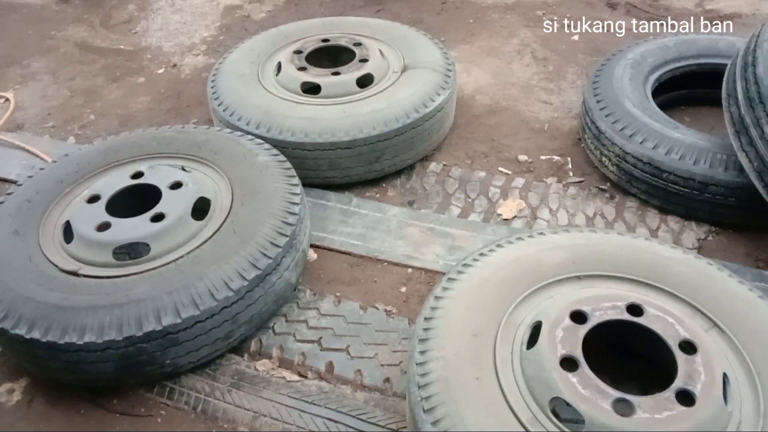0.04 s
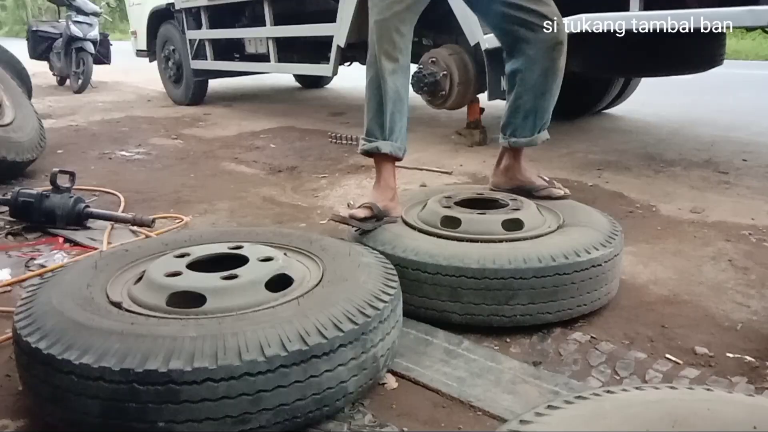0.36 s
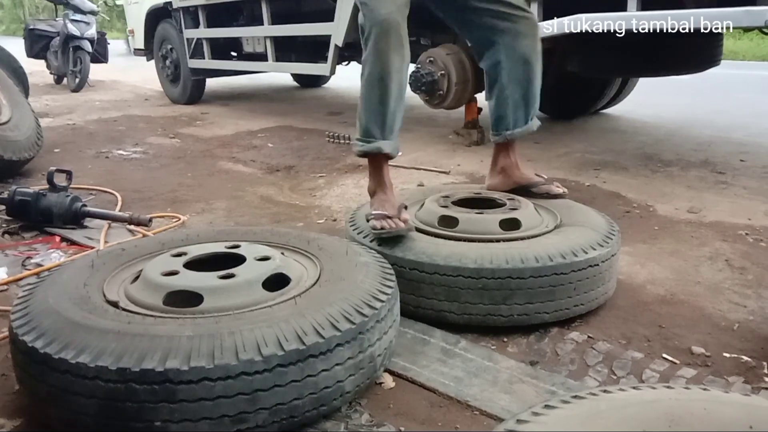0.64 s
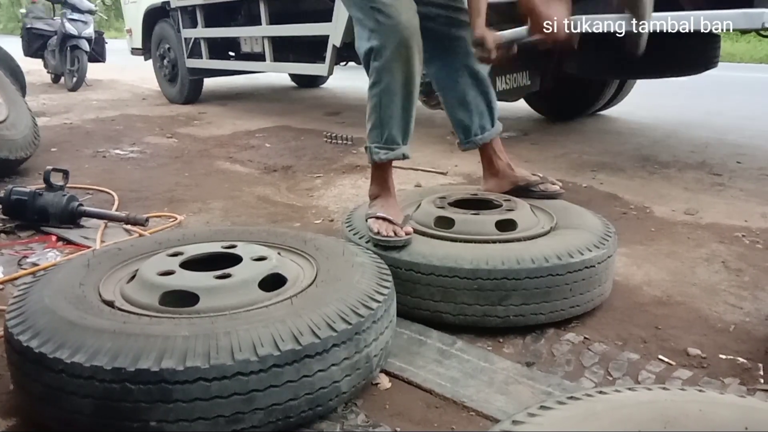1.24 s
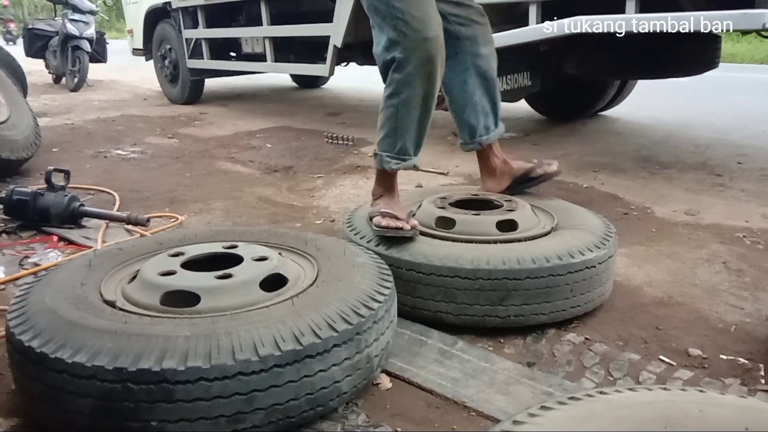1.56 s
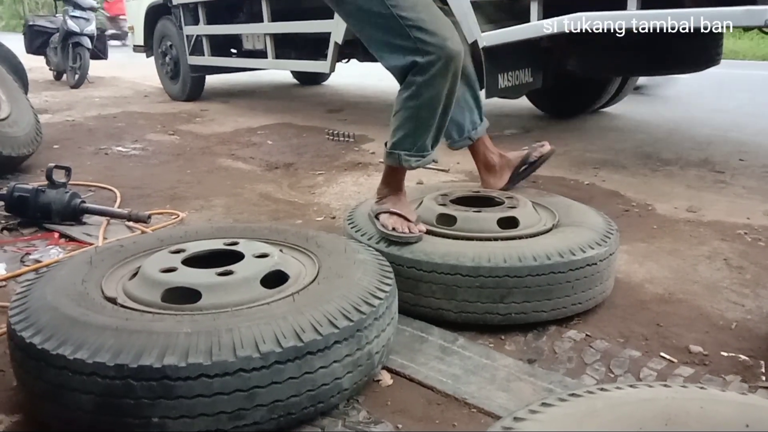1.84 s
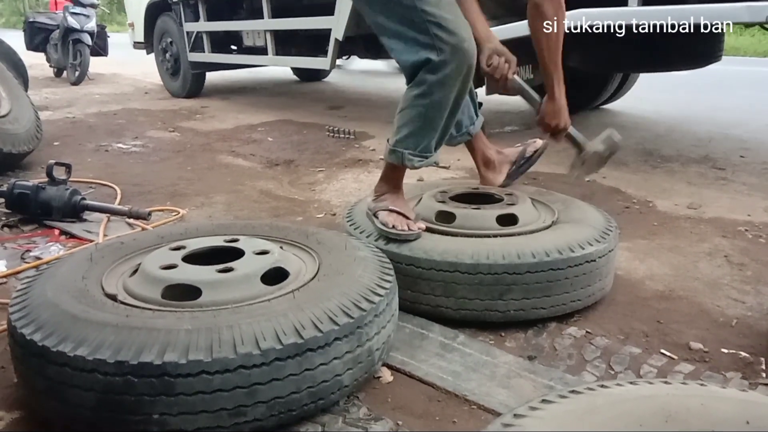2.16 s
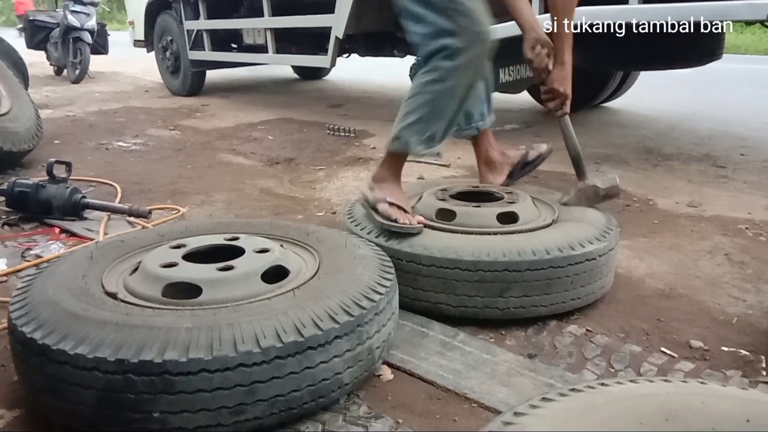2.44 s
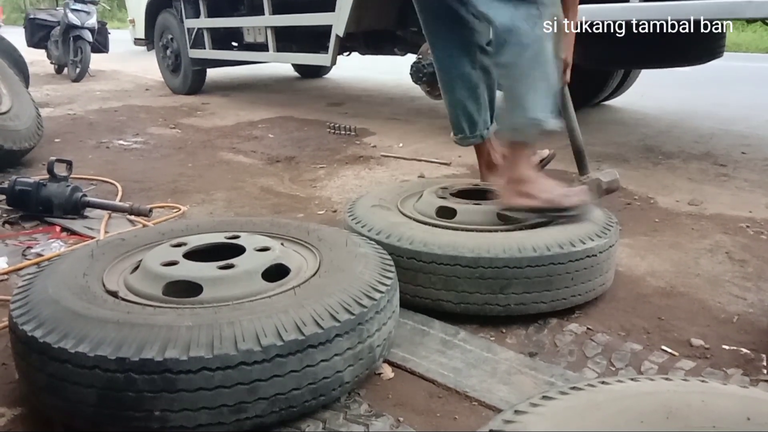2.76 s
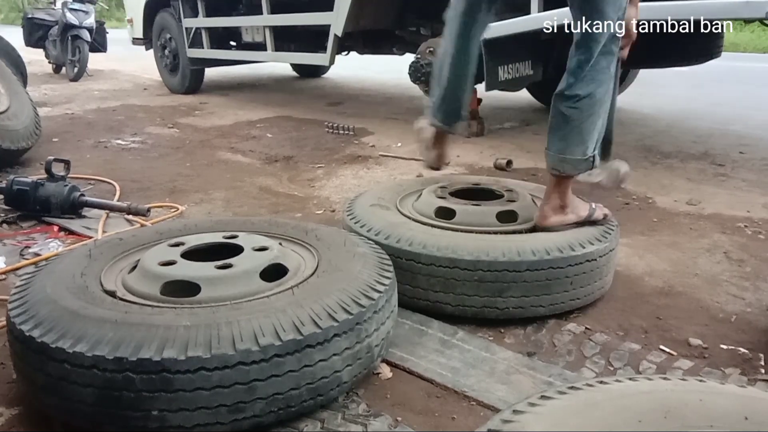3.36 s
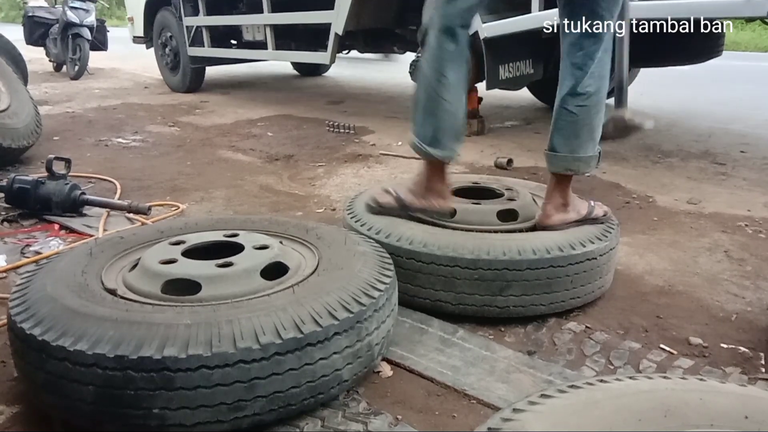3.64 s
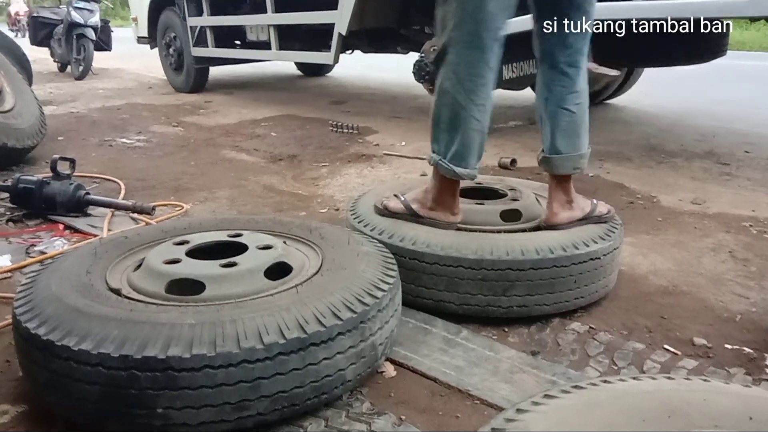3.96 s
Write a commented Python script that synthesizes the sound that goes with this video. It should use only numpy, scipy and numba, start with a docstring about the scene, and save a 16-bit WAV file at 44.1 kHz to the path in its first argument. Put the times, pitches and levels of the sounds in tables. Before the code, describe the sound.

A diesel truck engine idles while a sledgehammer twice strikes a tyre's steel rim.

```python
"""A fast engine drones and whines under an air hiss, then stops dead, at a roadside tyre shop. A slow diesel
fades in: each firing excites the modes of the exhaust pipe (a chug) and of the block (a clatter), and the
valves tick in between. Now and then metal buzzes briefly. A sledgehammer twice strikes a truck tyre at its
steel rim, which rings freely; a limiter ducks the engine around each blow."""
import sys
import numpy as np
from scipy import signal
from scipy.fft import rfft, irfft
from scipy.io import wavfile
from scipy.ndimage import uniform_filter1d, minimum_filter1d
from numba import njit

SR = 44100
rng = np.random.default_rng(int(sys.argv[2]) if len(sys.argv) > 2 else 0)


def generate_wav(sig):
    """Save sig (samples, or channels by samples) to the path in sys.argv[1] as 16-bit PCM at SR."""
    pcm = np.round(np.clip(np.atleast_2d(sig).T, -1, 1) * 32767).astype(np.int16)
    wavfile.write(sys.argv[1], SR, pcm)


N = 176400

# Buzzes of loose metal: start_s, pitch_hz, level_db
RATTLES = [(1.12, 3310, -31), (1.27, 2870, -29.5), (2.205, 3090, -31), (2.575, 3110, -36),
           (3.215, 3040, -30.5), (3.68, 2770, -31), (3.755, 2780, -34)]
# Tones of the fast engine: pitch_hz, relative_db
FAST_TONES = [(86, -38), (126, -47), (155, -33), (206, -38.5), (258.5, -37.5), (310, -37.5), (361, -44),
              (413, -42.5), (465, -43), (518, -49), (569, -42)]
# Spectrum of its air hiss: frequency_hz, relative_db
HISS_SPECTRUM = [(60, -17), (150, -7.5), (340, -13), (450, -12), (673, -15), (1140, -10.5), (1590, -14),
                 (2240, -12), (3300, -14.5), (4000, -9), (5100, -21), (5900, -13.5), (7800, -19),
                 (9500, -29.5), (11000, -35), (13000, -21.5), (15300, -17)]
# Path of its climbing whine: time_s, pitch_hz, level_db
WHINE_PATH = [(0, 410, -48), (.09, 416.5, -46), (.14, 419.7, -27.5), (.21, 427, -34), (.25, 446, -31),
              (.32, 454, -39.5)]

# Loudness contour of the diesel: time_s, clatter_gain_db, bass_gain_db
DIESEL_GAINS = [(.451, -40, -39), (0.471, -14.5, -19), (0.514, -3, -2), (.55, 3.5, -0.5), (.72, 7, 6.5),
                (.93, 7, 4.5), (1.05, 2, 0.5), (1.35, 0, 0), (1.9, 1.5, -1), (2.25, 2.5, 1),
                (2.45, 0.5, -0.5), (3.3, 0.55, -0.5), (4, 0.5, -1)]
# Spectrum of its low rumble: frequency_hz, relative_db
RUMBLE_SPECTRUM = [(45, -34), (70, -2.5), (120, -3), (180, -1), (290, -7.5), (400, -8.5), (700, -21),
                   (2000, -42)]
# Droning harmonics of the engine cycle: approximate_pitch_hz, relative_db
DRONE_TONES = [(119, -53.5), (141, -47.5), (152, -43), (162, -51), (173, -44), (184, -47.5), (195, -48.5),
               (217, -47.5), (238, -49), (260, -47), (282, -55.5), (293, -46), (325, -51.5), (379, -55),
               (466, -53), (574, -51.5)]
# Modes of the exhaust pipe: pitch_hz, relative_db, t60_s
PIPE_MODES = [(72.6, -35.5, .12), (87.4, -39, 0.1)]
# Valve impacts after each firing: delay_cycles, relative_db, decay_s
VALVE_IMPACTS = [(0.259, 0, 0.011), (.54, 2.5, .016), (.72, -4, 0.03)]
# Spectrum of the valve ticks: frequency_hz, relative_db
VALVE_SPECTRUM = [(1500, -7), (4000, 9), (7500, -1), (9200, -16), (11400, -24), (12500, -9), (15300, -4)]
# Resonances of the engine block: centre_hz, width_hz, boost_db
BLOCK_RESONANCES = [(787, 42, 5.5), (1021, 14, 8.3), (1203, 20, 5.5), (1303, 64, 3.2), (1417, 40, 3.9),
                    (1780, 32, 1.9), (1893, 19, 4), (2021, 47, 5.2), (2455, 45, 3.9), (2545, 80, 4.4),
                    (2789, 93, 7.4), (3105, 33, 6), (3620, 30, 3.2), (4052, 14, 2.9)]
# Spectrum of the continuous clatter: frequency_hz, relative_db
CLATTER_SPECTRUM = [(150, -10.5), (410, -14), (500, -6.5), (690, -7.5), (850, -3), (1300, -1), (1700, -3),
                    (2800, -4), (3900, -7.5), (5000, -16.5), (7800, -25.5), (9200, -41), (16000, -44.5)]
# Spectrum of the combustion knock: frequency_hz, relative_db
KNOCK_SPECTRUM = [(300, -17.5), (660, -13), (800, 4), (950, -4.5), (1300, -0.5), (2000, 1.5), (3000, -3),
                  (4200, -10), (6000, -21.5), (9000, -37), (15000, -50)]
# Firings of set strength, most of them harder than the rest: approximate_time_s, gain_db
ACCENTED_FIRINGS = [(.55, 2), (.73, 1), (1.01, 2.5), (1.47, 5.5), (1.57, 5.5), (1.84, 2), (1.93, -1),
                    (2.12, 4), (2.3, 7), (2.4, -0.5), (2.49, 5.5), (2.58, 3), (2.77, 6.5), (2.86, 2.5),
                    (3.04, 4), (3.32, 4), (3.5, 3.5), (3.96, 6)]

# Hammer blows: start_s, crack_gain_db, thud_gain_db, thud_pitch_hz, ring_gain_db
BLOWS = [(.956, -2, 0, 174, -12), (2.0344, -4, -8.5, 187, -12.5)]
# Modes of the steel rim: pitch_hz, relative_db, t60_s
RIM_MODES = [(212.5, -16, 1.3), (1285, -17, 0.15), (1425, -16, 0.29), (1880, -11, 0.47), (2550, -17, .3),
             (2815, -13, 0.27), (3310, -14, 0.45), (3348, -12, .4), (3903, -13, .2), (5500, -18, 0.29),
             (6140, -15, 0.23), (7360, -25, .24)]
# Spectrum of the steel-on-steel crack: frequency_hz, relative_db
CRACK_SPECTRUM = [(100, -8), (450, -1), (900, -1.5), (1500, 4), (2500, -14), (3800, -6), (6500, -9),
                  (9000, -12.5), (10500, -32), (12000, -23), (14500, -11)]
# Spectrum of the rim's jangle: frequency_hz, relative_db
JANGLE_SPECTRUM = [(200, 4), (1000, -14), (3000, 3), (5000, -7.5), (7500, -9.5), (9500, -25.5),
                   (11300, -30), (14500, -24)]

FAST_FIRING_HZ, FAST_STOP_S, SWELL_DB_PER_S = 51.7, 0.32, 6.5
CYCLE_HZ, FIRST_FIRING_S, DIESEL_START_S = 10.835, 0.088, 0.451
CEILING_DB, LOOK_AHEAD_S, RELEASE_S, CUTOFF_HZ = -4, 0.0099, 0.043, 15600
t = np.arange(N) / SR


def undb(db):
    """Amplitude ratio: tenfold for every 20 decibels."""
    return 10 ** (np.asarray(db) / 20)


def drift(rate_hz):
    """Moving averages smooth random steps into a drift with a spread near 1."""
    hold = max(int(SR / rate_hz), 1)
    steps = np.repeat(rng.standard_normal(N // hold + 1), hold)
    return 1.53 * uniform_filter1d(uniform_filter1d(steps, hold), hold)[:N]


def noise(spectrum, resonances=()):
    """Source and filter: white noise shaped by a spectrum and resonant peaks, scaled to rms 1."""
    f = np.arange(N // 2 + 1) * SR / N + 1e-3
    hz, db = np.array(spectrum, float).T
    gain = undb(np.interp(np.log(f), np.log(hz), db)) * np.minimum(f / hz[0], 1) ** 2
    for centre, width, boost_db in resonances:
        gain *= undb(boost_db / (1 + (2 * (f - centre) / width) ** 2))
    shaped = irfft(rfft(rng.standard_normal(N)) * gain, N)
    return shaped / shaped.std()


def burst(age, rise_s, decay_s, hold_s=0):
    """Transient envelope: linear rise, optional hold, exponential decay."""
    return np.clip(age / rise_s, 0, 1) * np.exp(-np.maximum(age - rise_s - hold_s, 0) / decay_s)


def ring(modes, age):
    """Free vibration: a sum of damped modes, struck at age 0."""
    age = np.maximum(age, 0)
    return sum(undb(db) * np.sin(2 * np.pi * hz * age) * np.exp(-np.log(1000) * age / t60)
               for hz, db, t60 in modes)


def repeat(times, sizes, response):
    """Convolution with an impulse train repeats one response at each time and size."""
    impulses = np.zeros(N)
    np.add.at(impulses, np.clip(times * SR, 0, N - 1).astype(int), sizes * (times * SR < N))
    return signal.fftconvolve(impulses, response)[:N]


def hum(tones, waver_db):
    """Superposition of sinusoids in random phase, each wavering in level."""
    return sum(np.sqrt(2) * undb(db + waver_db * drift(8)) * np.sin(2 * np.pi * (hz * t + rng.random()))
               for hz, db in tones)


def rattles():
    """Brief buzzes: metal rattles in one narrow band at a time."""
    out = np.zeros(N)
    for start, hz, db in RATTLES:
        buzz = drift(440) * np.sqrt(2) * np.sin(2 * np.pi * hz * t)
        out += undb(db) * buzz * burst(t - start, rise_s=0.02, decay_s=0.033)
    return out


def fast_engine():
    """Amplitude modulation: air hiss pulses at the firing rate over a drone and a climbing whine."""
    hiss = undb(-22) * noise(HISS_SPECTRUM) * (1 + 0.089 * np.cos(2 * np.pi * FAST_FIRING_HZ * t))
    times, hz, db = np.array(WHINE_PATH).T
    phase = 2 * np.pi * np.cumsum(np.interp(t, times, hz)) / SR
    whine = undb(np.interp(t, times, db) + 3.5 * drift(120)) * np.sqrt(2) * np.sin(phase)
    swell = undb(SWELL_DB_PER_S * (np.minimum(t, FAST_STOP_S) - FAST_STOP_S / 2))
    dead_stop = np.clip((FAST_STOP_S - t) / 0.0026, 0, 1)
    return ((hiss + hum(FAST_TONES, waver_db=1.5)) * swell + whine) * dead_stop


def drone():
    """A periodic source sounds harmonics of its cycle; their slow beats are evened out."""
    harmonics = [(round(hz / CYCLE_HZ) * CYCLE_HZ, db) for hz, db in DRONE_TONES]
    tone = undb(1) * hum(harmonics, waver_db=1.3)
    power = uniform_filter1d(tone ** 2, int(0.031 * SR)) + 1e-12  # beats faster than 31 ms remain
    return tone * np.sqrt(power.mean() / power)


def exhaust(firings, scatter_db):
    """Pipe resonance: each firing thumps over the drone; the small mouth radiates no deep bass."""
    rise_s, lead_s = 0.028, 0.0156
    onset = 1 - np.cos(np.pi * np.minimum(t / rise_s, 1))
    thumps = repeat(firings - lead_s, undb(scatter_db), ring(PIPE_MODES, t) * onset)
    radiation = signal.butter(6, 55.4, "high", fs=SR, output="sos")
    return signal.sosfilt(radiation, thumps + drone())


def valves(firings, scatter_db):
    """Impact noise: the valve gear ticks three times a cycle above a faint steady hiss."""
    ticks = np.zeros(N)
    for delay, db, decay_s in VALVE_IMPACTS:
        tick = burst(t, rise_s=0.00085, decay_s=decay_s)
        ticks += repeat(firings + delay / CYCLE_HZ, undb(db + scatter_db), tick)
    return undb(-43) * noise(VALVE_SPECTRUM) * (ticks + undb(-10))


def block(firings, scatter_db):
    """Structural resonance: the block colours both the combustion knocks and a grainy clatter."""
    knock_db = scatter_db.copy()
    for when, gain_db in ACCENTED_FIRINGS:
        knock_db[np.argmin(abs(firings - when))] = gain_db
    rise_s = 0.017
    envelope = repeat(firings - rise_s, undb(knock_db), burst(t, rise_s, decay_s=0.015, hold_s=0.019))
    clatter = undb(-28.5 + 0.78 * drift(250)) * noise(CLATTER_SPECTRUM, BLOCK_RESONANCES)
    knocks = envelope * undb(-31.5 + 1.4 * drift(400)) * noise(KNOCK_SPECTRUM, BLOCK_RESONANCES)
    return knocks + clatter


def diesel():
    """Periodic excitation: evenly timed firings of uneven strength drive block, valves and exhaust."""
    firings = np.arange(FIRST_FIRING_S, N / SR, 1 / CYCLE_HZ)
    knock_db, valve_db, pipe_db = (rng.standard_normal((len(firings), 3)) * [1, 0.5, 3]).T
    clatter = block(firings, knock_db) + valves(firings, valve_db)
    bass = exhaust(firings, pipe_db) + undb(-41) * noise(RUMBLE_SPECTRUM)
    times, clatter_db, bass_db = np.array(DIESEL_GAINS).T
    clatter *= undb(np.interp(t, times, clatter_db))
    bass *= undb(np.interp(t, times, bass_db))
    return (t > DIESEL_START_S) * (clatter + bass)


def hammer():
    """Impulsive excitation: steel cracks on steel, the tyre thuds, the rim rings and jangles."""
    out = np.zeros(N)
    for start, crack_db, thud_db, thud_hz, ring_db in BLOWS:
        age = t - start
        crack = undb(crack_db) * noise(CRACK_SPECTRUM) * burst(age, rise_s=0.0011, decay_s=0.0054)
        thud = undb(thud_db) * np.sin(2 * np.pi * thud_hz * age) * burst(age, 0.004, decay_s=0.007)
        jangle = undb(-3) * noise(JANGLE_SPECTRUM) * burst(age, rise_s=0.014, decay_s=0.046)
        rim = undb(-0.5) * ring(RIM_MODES, age)
        out += crack + thud + undb(ring_db) * (rim + jangle)
    return out


def scene():
    """Superposition: the pressures of both engines, the loose metal and the hammer add at one point."""
    return (fast_engine() + diesel() + rattles() + hammer())[None, :]


@njit
def follow_peaks(excess, retention):
    """Peak detection: the output follows a rise at once and relaxes exponentially."""
    out, held = np.empty(len(excess)), 0.
    for i in range(len(excess)):
        held = max(excess[i], held * retention + 1e-18)
        out[i] = held
    return out


def record(dry):
    """Look-ahead limiting lowers the gain around the loudest peaks; a low-pass cuts the top treble."""
    ahead = int(LOOK_AHEAD_S * SR)
    excess = np.log(np.maximum(abs(dry[0]) / undb(CEILING_DB), 1))
    coming_peak = -minimum_filter1d(-excess, ahead, origin=-(ahead // 2))
    reduction = follow_peaks(coming_peak, np.exp(-1 / (RELEASE_S * SR)))
    gain = np.exp(-uniform_filter1d(reduction, size=64))
    low_pass = signal.ellip(10, 0.2, 80, CUTOFF_HZ, fs=SR, output="sos")
    return signal.sosfilt(low_pass, dry * gain)


dry = scene()
out = record(dry)
generate_wav(out)
```